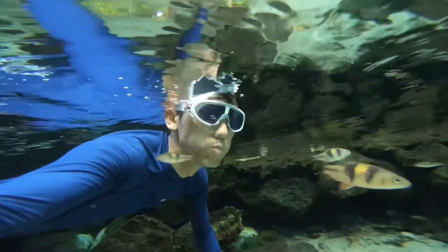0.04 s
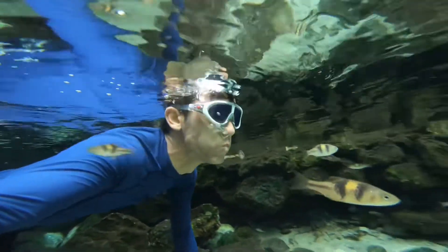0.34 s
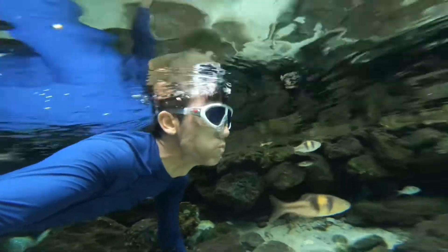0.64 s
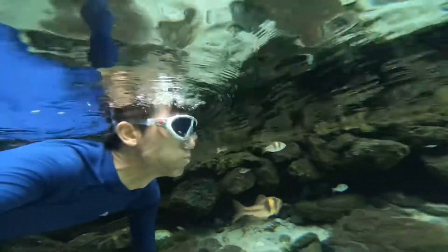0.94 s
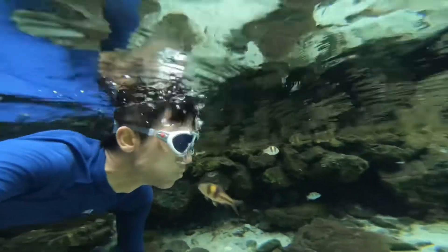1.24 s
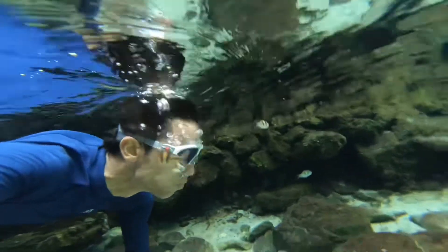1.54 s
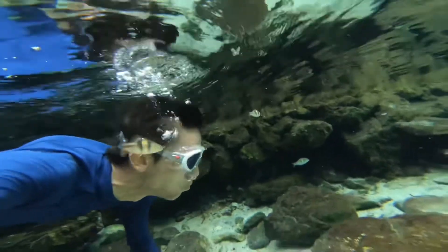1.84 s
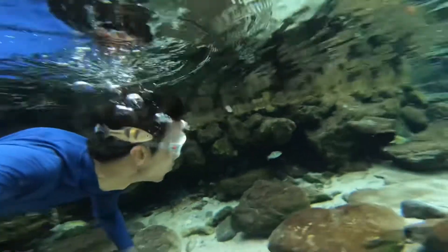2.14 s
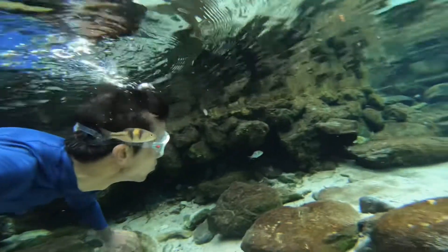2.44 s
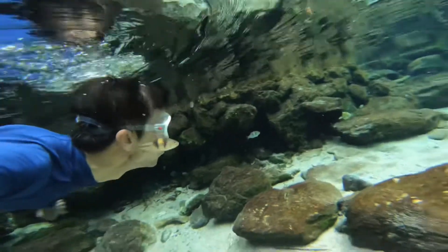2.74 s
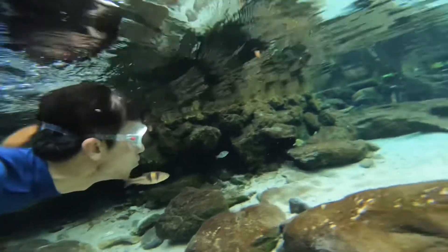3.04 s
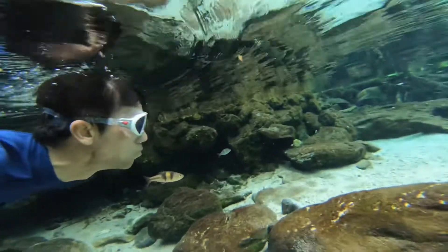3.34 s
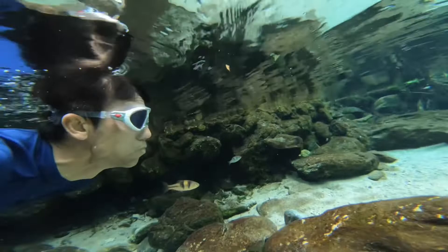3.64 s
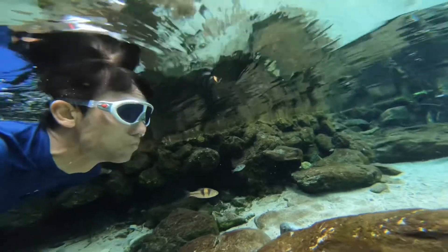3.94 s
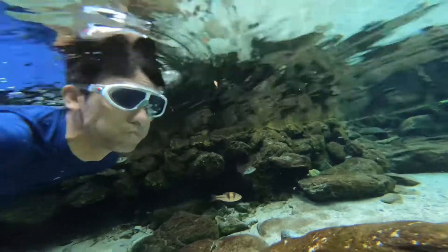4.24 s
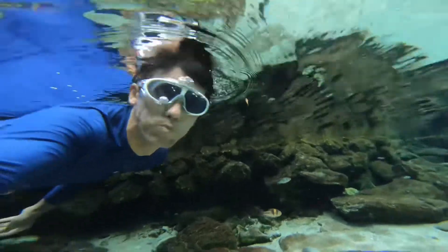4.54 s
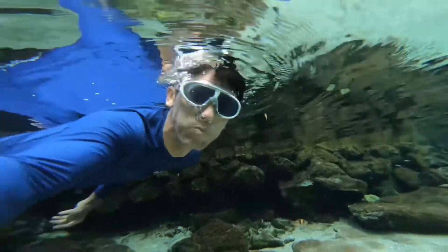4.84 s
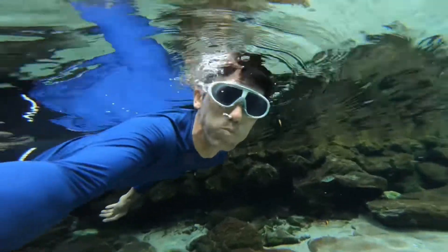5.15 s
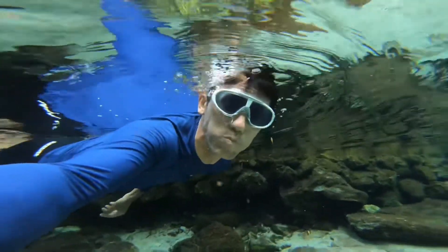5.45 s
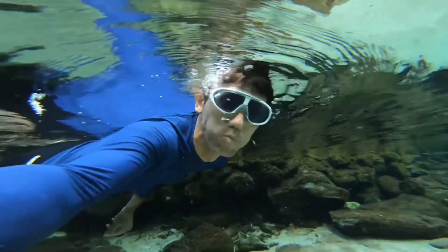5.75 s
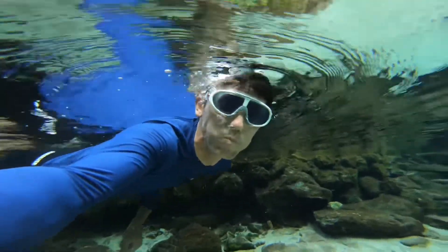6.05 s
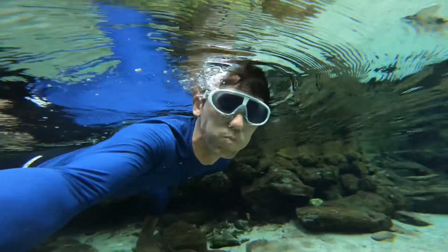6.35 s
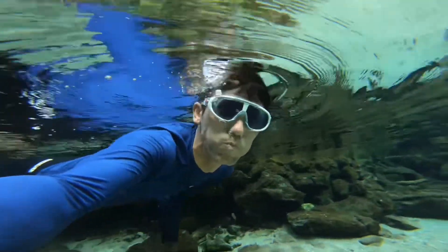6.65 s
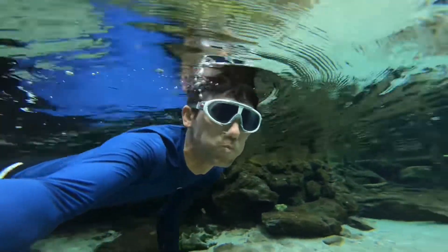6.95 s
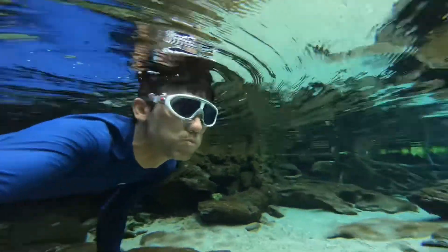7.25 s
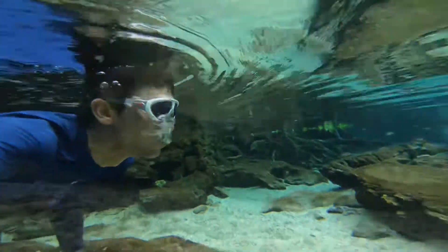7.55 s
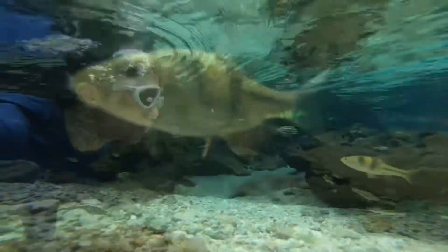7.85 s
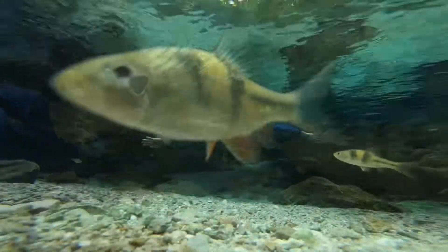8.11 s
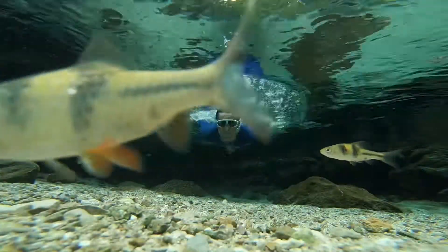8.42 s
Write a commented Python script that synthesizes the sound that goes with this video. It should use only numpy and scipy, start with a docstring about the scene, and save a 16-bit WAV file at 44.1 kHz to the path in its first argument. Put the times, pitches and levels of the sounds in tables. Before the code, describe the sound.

Soft, hollow bubbling and trickling surround a submerged microphone beside a swimmer in a stream. Small plinks and scattered knocks on the housing run throughout, and an early burst of gurgling brings several round, ringing bubbles. In the second half the strokes and current become louder and busier, with a few deep glugs and sharp little ticks. A patch of fizzing bubbles draws near at the close.

```python
"""A camera in a watertight housing, just under a stream's surface, beside a swimmer. From the start, strokes
babble and fizz and drips plink, coloured by the hollow housing; from 0.5 s, knocks set it ringing.
From 1.3 s, clouds of air gurgle and large bubbles ring out. Grains tick on the wall; one click at 3.7 s.
From 4.4 s, strokes and current grow livelier; air pockets glug near 5.1 and 7.5 s.
From 7.8 s, froth drifts up. Faint microphone hiss throughout."""
import sys
import numpy as np
from scipy import signal
from scipy.fft import rfft, irfft, next_fast_len
from scipy.io import wavfile
from scipy.ndimage import uniform_filter1d

SR = 44100
rng = np.random.default_rng(int(sys.argv[2]) if len(sys.argv) > 2 else 0)


def log_audio(samples):
    """Write samples as a 16-bit WAV file to the path given in sys.argv[1]."""
    # one column per channel
    frames = np.atleast_2d(samples).T
    # limit to full scale, then quantise
    limited = np.clip(frames, -1, 1)
    pcm = np.round(limited * 32767).astype(np.int16)
    wavfile.write(sys.argv[1], SR, pcm)


N = 373968
FFT_SIZE = next_fast_len(N + 8192)
FREQ_HZ, TIME_S = np.fft.rfftfreq(FFT_SIZE, 1 / SR), np.arange(N) / SR

# strokes and wavelets: (start [s], length [s], babble [dB], fizz [dB], slosh [dB])
STROKES = [(-0.2, 0.9, -52.5, -67.5, -79), (0.95, 0.59, -80, -63.5, -61), (1.42, 0.48, -57.5, -67.5, -44.5),
           (1.9, 0.59, -55.5, -79, -66), (2.62, 0.49, -53.5, -72.5, -54), (3.88, 0.13, -47.5, -68.5, -58),
           (4.38, 0.28, -42.5, -62.5, -36), (4.9, 0.3, -43.5, -61.5, -44), (5.5, 0.45, -44, -61.5, -44.5),
           (6, 0.74, -43.5, -66, -51), (6.83, 0.16, -39.5, -58, -36.5), (7.17, 0.45, -46, -62, -56.5),
           (8.05, 1, -43.5, -59.5, -75)]
# stream between strokes: (time [s], babble [dB], slosh [dB])
CURRENT = [(0, -62, -63.5), (1.1, -63, -55.5), (3.4, -62.5, -52.5), (5.4, -50, -49), (6.3, -48.5, -53.5),
           (8.48, -44, -66)]
# air dragged under: (start [s], length [s], burble [dB], gurgle [dB])
AIR_CLOUDS = [(1.32, 0.31, -45.5, -46.5), (1.8, 0.648, -48, -53.5), (2.6, 0.27, -53, -51.5),
              (3.45, 1, -58, -55), (4.5, 0.48, -46.5, -61), (5.35, 0.634, -48.5, -58.5),
              (6.15, 0.76, -56, -53), (7.33, 0.29, -47.5, -48.5)]
# blows on the housing: (time [s], level [dB], hardness [dB])
KNOCKS = [(0.539, -33, -10.5), (0.778, -32.5, 1.5), (1.5871, -24.5, -2), (1.762, -28, -13.5),
          (1.8705, -31, 6.5), (2.1485, -28.5, -1), (2.7775, -24, -2), (2.933, -29, 2), (3.166, -29.5, -12),
          (3.687, -25, -1), (3.799, -33.5, -21), (4.366, -22.5, -3.5), (4.465, -20.5, -2), (4.585, -25, 6),
          (4.9737, -28.5, 6), (5.1497, -28, 7), (5.7912, -19, 1.5), (7.0235, -27.5, 5.5)]
# large ringing bubbles: (time [s], pitch [Hz], level [dB])
LARGE_BUBBLES = [(1.4065, 588, -35), (1.4983, 599, -23), (1.585, 740, -28.5), (1.631, 164, -35),
                 (1.689, 566, -35), (1.852, 656, -33), (2.221, 807, -30), (2.2238, 637, -19),
                 (2.378, 159, -33), (2.747, 645, -34), (5.6091, 613, -33.5), (7.578, 595, -36),
                 (7.642, 625, -31.5)]
# drips and small bubbles close by: (time [s], pitch [Hz], level [dB])
DRIPS = [(0.0985, 1243, -29), (0.319, 1460, -38), (0.447, 1260, -31.5), (0.657, 2510, -31),
         (0.973, 2910, -41.5), (1.517, 2860, -36), (1.713, 1304, -36.5), (1.8838, 2920, -41.5),
         (1.971, 2980, -40), (1.974, 1180, -25), (2, 1418, -37), (2.456, 2680, -45.5), (2.642, 1206, -33.5),
         (2.786, 1300, -29), (3.024, 2780, -37), (3.234, 2270, -35), (3.417, 2240, -41.5),
         (3.5678, 1345, -29), (3.7088, 688, -28), (3.748, 1360, -35), (3.882, 731, -29),
         (3.9665, 1150, -23.5), (4.003, 1370, -24.5), (4.048, 1190, -32.5), (4.2399, 687, -29.5),
         (4.604, 1140, -22.5), (4.819, 1162, -29.5), (6.9115, 1446, -24), (6.999, 1310, -25),
         (7.2336, 1213, -26), (8.237, 1800, -25.5), (8.3093, 1800, -27)]
# air pockets: (time [s], length [s], start pitch [Hz], end pitch [Hz], level [dB])
GLUGS = [(5.088, 0.065, 66, 62, -23.5), (7.458, 0.097, 119, 83, -24.5), (7.529, 0.033, 84.4, 70.5, -21)]
# sand and tiny bubbles hitting the wall: (time [s], pitch [Hz], level [dB])
TICKS = [(0.9711, 6650, -44), (2.359, 6900, -46), (3.054, 5380, -35), (3.6311, 5460, -45.5),
         (4.7306, 5250, -45), (4.8327, 5300, -33), (6.0626, 8020, -34), (6.0856, 5830, -35.5),
         (6.347, 5640, -32)]
# housing resonances: (frequency [Hz], width [Hz], washed gain [dB], knocked gain [dB])
HOUSING_MODES = [(168.4, 47.8, -0.5, 19.5), (415.7, 30, -5, 9.5), (617, 71, -8, -19.5),
                 (789, 142, -13.5, -9), (1169.4, 57.7, 6.5, 7), (1414, 93, 3, -51), (1850, 222, -8, -25),
                 (2310, 410, -5, -19), (2676, 150, -8, 12), (3072, 240, -14, -56), (5463, 370, -10, -35),
                 (5940, 1740, -15.5, -47)]
# wall to microphones: (frequency [Hz], left minus right [dB], left lead [rad])
MIC_PATHS = [(62.5, -4, 1), (186, -8.5, -1.13), (393, -5.5, 3.5), (590, -16.5, 5), (783, 1, 1.5),
             (1013, -7, 0.83), (1217, 8.5, 4), (1322, -7, 2.5), (1812, 2.5, -0.5), (1915, -3.5, 2),
             (2580, 6, 1.82), (5800, -3, 0.64), (5980, -6.5, 1), (7900, 3, -2)]
# microphone hiss: (frequency [Hz], relative density [dB])
HISS_SPECTRUM = [(100, 6), (380, 7.5), (1000, -1.5), (4000, -13.5), (12000, -21), (14400, -34)]

TICK_BAND_HZ = (4720, 7800)  # wall passband for ticks and spatter


def water(lap_rms_db=1.7, fizz_share=0.6):
    """Pressure swells, rushing current, five bubble sizes in lapping spurts, crackle of surfacing air."""
    babble_db, fizz_db, slosh_db = stroke_levels_db()
    burble_db = surges_db(AIR_CLOUDS, column=2, calm_db=-59.5, rise_s=0.008, fade_s=0.052)
    gurgle_db = surges_db(AIR_CLOUDS, column=3, calm_db=-61, rise_s=0.008, fade_s=0.052)
    trickle_db = (1 - fizz_share) * babble_db + fizz_share * fizz_db
    wall = washed_wall()
    lapping = spectrum(rng.standard_normal(N)) * band(3.4, 16)
    lap_db = lap_rms_db * unit_rms(irfft(lapping, FFT_SIZE)[:N])
    swells, eddies = spectrum(rng.standard_normal((2, 2, N)))
    slosh = amp(slosh_db + 2 * lap_db) * unit_rms(to_mics(*swells * band(6.6, 32.2)))
    rush = amp(babble_db - 13) * unit_rms(to_mics(*eddies * band(208, 980)))
    burble = swarm(burble_db + lap_db, wall * band(124, 246), pitch_hz=(131.3, 263),
                   peak_per_s=60, decay_cycles=0.96, spread_db=2, wash_db=-5.5)
    gurgle = swarm(gurgle_db + lap_db, wall * band(384, 896), pitch_hz=(496, 916),
                   peak_per_s=130, decay_cycles=1.08, spread_db=6, wash_db=-9, crowding=0.3)
    babble = swarm(babble_db + lap_db, wall * band(945, 1696, order=3), pitch_hz=(1036, 1493),
                   peak_per_s=500, decay_cycles=4, spread_db=4, wash_db=-3.5, crowding=0.9)
    trickle = swarm(trickle_db + lap_db, wall * band(1615, 3054, order=6), pitch_hz=(1716, 3155),
                    peak_per_s=700, decay_cycles=4.1, spread_db=3.5, wash_db=-3.5, crowding=0.9)
    fizz = swarm(fizz_db + lap_db, wall * band(3030, 8960), pitch_hz=(5270, 7700),
                 peak_per_s=1000, decay_cycles=4.7, spread_db=9, wash_db=0.2)
    splashes = crackle(gurgle_db - 13.5 + lap_db, band(2160, 3220, order=3))
    splashes += crackle(gurgle_db - 19, wall * band(*TICK_BAND_HZ, order=4))
    return slosh + burble + shoals(rush + gurgle + babble + trickle) + fizz + splashes


def stroke_levels_db():
    """Babble, fizz and slosh: each stroke lifts all three above the current."""
    times_s, babble_db, slosh_db = np.transpose(CURRENT)
    calm_db = np.interp(TIME_S, times_s, babble_db)
    return (surges_db(STROKES, column=2, calm_db=calm_db),
            surges_db(STROKES, column=3, calm_db=0.8 * calm_db - 26),
            surges_db(STROKES, column=4, calm_db=np.interp(TIME_S, times_s, slosh_db), fade_s=0.065))


def surges_db(rows, column, calm_db, rise_s=0.06, fade_s=0.087):
    """Surges build, hold and fade over calm water; long ones build more slowly."""
    power = amp(calm_db) ** 2 * np.ones(N)
    for row in rows:
        age_s, length_s = TIME_S - row[0], row[1]
        attack = np.clip(age_s / (rise_s + 0.15 * length_s), 0, 1)
        release = np.exp(-np.maximum(age_s - length_s, 0) / fade_s)
        power += (amp(row[column]) * attack * release) ** 2
    return 10 * np.log10(power)


def swarm(level_db, colour, pitch_hz, peak_per_s, decay_cycles, spread_db, wash_db,
          crowding=0.6, sizes=28):
    """Near bubbles over a wash of distant ones; harder stirring frees more."""
    activity = amp(crowding * (level_db - level_db.max()))
    near = np.zeros((2, N))
    for hz in np.geomspace(*pitch_hz, sizes):
        age = np.arange(int(8 * decay_cycles / hz * SR)) / SR * hz / decay_cycles
        phase_rad = 2 * np.pi * decay_cycles * age * (1 + 0.0046 * age)
        ring = age * np.exp(-age) * np.sin(phase_rad) * np.sqrt(hz / pitch_hz[0])
        for channel in near:
            when, chance, size, sign = rng.random((int(peak_per_s * N / SR / sizes), 4)).T
            onsets = (when * N).astype(int)
            size_db = spread_db * np.minimum(-np.log(size), 3)
            gain = amp(size_db) * np.sign(sign - 0.5) / np.sqrt(activity[onsets])
            for k in np.flatnonzero(chance < activity[onsets]):
                add(channel, onsets[k] / SR, gain[k] * ring)
    near = spectrum(unit_rms(near)) * colour
    far = spectrum(rng.standard_normal((2, N)) * np.sqrt(activity)) * colour
    return amp(level_db) * unit_rms(unit_rms(to_mics(*near)) + amp(wash_db) * unit_rms(to_mics(*far)))


def shoals(x, depth_db=3):
    """Bubbles come in shoals of like size, so the strongest pitches keep moving."""
    frames = signal.stft(x, nperseg=512)[2]
    patches = rng.standard_normal(frames.shape[:0:-1])  # time by frequency
    for _ in range(2):
        patches = uniform_filter1d(patches, size=11, axis=0)
        patches = uniform_filter1d(patches, size=4, axis=1)
    patchy = signal.istft(frames * amp(depth_db * unit_rms(patches).T))[1][:, :N]
    return unit_rms(patchy) * np.std(x)


def crackle(level_db, colour, rate_per_s=22, spread_db=7, decay_s=0.0039):
    """Bubbles burst at the surface: short, irregular, unpitched."""
    gains = amp(spread_db * np.minimum(rng.exponential(1, N), 3))
    impulses = gains * (rng.random(N) < rate_per_s / SR)
    bursts = signal.lfilter([1], [1, -np.exp(-1 / (decay_s * SR))], impulses)
    spatter = bursts * rng.exponential(1, N) * rng.standard_normal((2, N))
    return amp(level_db) * unit_rms(to_mics(*spectrum(spatter) * colour))


def knocks(lag_s=0.00078, rebound_s=0.00278, push_s=0.0059, churn_s=0.0057, churn_gain=0.32):
    """Blows ring the housing and churn the water. Soft: duller, later rebound. Hard: a plop of water."""
    wall = sum((-1) ** k * amp(db) * resonance(hz, 1.32 * width_hz)
               for k, (hz, width_hz, _, db) in enumerate(HOUSING_MODES))
    balance = amp([[-6], [0]])
    thud = impulse_response(wall * band(31, 1650)) * balance
    clack = impulse_response(wall * band(447, 1280, order=4))
    out, t = np.zeros((2, N)), np.arange(SR // 20) / SR
    push = t / push_s * np.exp(1 - t / push_s) * balance
    for time_s, db, hardness_db in KNOCKS:
        ring = np.zeros((2, SR // 10))
        add(ring, 0, amp(hardness_db + 2.5) * clack)
        add(ring, lag_s, thud)
        add(ring, lag_s + rebound_s * amp(-0.43 * hardness_db), 0.38 * rng.random() * thud)
        add(ring, rebound_s, amp(hardness_db - 11) * push)
        eddy = rng.standard_normal(len(t)) * t * np.exp(-t / churn_s)
        eddy /= np.linalg.norm(eddy)
        ring += churn_gain * signal.fftconvolve(ring, eddy[None], axes=1)[:, :SR // 10]
        cutoff_hz = 1850 * amp(0.1 * hardness_db)  # water rounds off the blow
        lowpass = signal.butter(4, cutoff_hz, fs=SR, output="sos")
        add(out, time_s, amp(db) * signal.sosfilt(lowpass, ring))
    return out


def large_bubbles(glide=0.0089, echo_db=-17, echo_decay_s=0.15):
    """Each swells and fades, pitch rising; strong ones last longer. The bed scatters a faint tail."""
    out, mean_db = np.zeros(N), np.mean([db for _, _, db in LARGE_BUBBLES])
    for time_s, hz, db in LARGE_BUBBLES:
        rise_s = max(0.0043, 1 / hz)
        fade_s = max(0.0051 * amp(0.64 * (db - mean_db)), 1 / hz)
        t = np.arange(int((rise_s + 10 * fade_s) * SR)) / SR
        envelope = (t / rise_s) ** (rise_s / fade_s) * np.exp((rise_s - t) / fade_s)
        cycles = np.cumsum(hz * (1 + glide * (t - rise_s) / fade_s)) / SR
        add(out, time_s, amp(db) * envelope * np.sin(2 * np.pi * cycles))
    t = np.arange(SR // 4) / SR
    tail = rng.standard_normal((2, len(t))) * np.exp(-t / echo_decay_s)
    tail *= amp(echo_db) / np.linalg.norm(tail[0])
    direct = spectrum(out)
    return to_mics(direct) + to_mics(*direct * spectrum(tail))


def drips(decay_cycles=3.3, splash_db=-3, splash_s=0.0064):
    """A tiny splash and the plink of its trapped bubble, both ringing the wall."""
    out, t = np.zeros((2, N)), np.arange(SR // 20) / SR
    wall = impulse_response(washed_wall())
    for time_s, hz, db in DRIPS:
        age = t * hz / decay_cycles
        plink = age * np.exp(-age) * np.sin(2 * np.pi * hz * t)
        bandpass = signal.butter(3, [0.39 * hz, 1.42 * hz], "band", fs=SR, output="sos")
        spray = rng.standard_normal(len(t)) * rng.exponential(1, len(t))
        splash = signal.sosfilt(bandpass, spray * np.exp(-t / splash_s))
        for part, part_db in ((plink, 0), (splash, splash_db)):
            ring = signal.fftconvolve(part[None], wall, axes=1)
            add(out, time_s, amp(db + part_db) * ring / abs(ring).max())
    return out


def glugs():
    """A large air pocket throbs for a few cycles, pitch sinking."""
    out = np.zeros(N)
    for time_s, length_s, start_hz, end_hz, db in GLUGS:
        hz = np.linspace(start_hz, end_hz, int(length_s * SR))
        throb = np.sin(2 * np.pi * np.cumsum(hz) / SR)
        add(out, time_s, amp(db) * signal.windows.tukey(len(hz), 0.8) * throb)
    return to_mics(spectrum(out))


def froth(start_s=7.83, rise_s=0.67, ring_db=-39.5, rush_db=-42):
    """Bubbles of nearly one size over a low rush; both swell on approach."""
    nearness = np.clip((TIME_S - start_s) / rise_s, 0, 1)
    ringing = swarm(np.full(N, ring_db), band(1680, 2040), pitch_hz=(1730, 2000),
                    peak_per_s=100, decay_cycles=5.8, spread_db=6, wash_db=-6, sizes=8)
    eddies = spectrum(rng.standard_normal((2, N))) * band(91, 490, order=3)
    rush = amp(rush_db) * unit_rms(to_mics(*eddies))
    return nearness ** 2 * ringing + nearness ** 3 * rush


def ticks(width_hz=520, rattle_s=0.0021):
    """A grain rattles on the wall and leaves a short, high ring."""
    out, t = np.zeros(N), np.arange(SR // 20) / SR
    for time_s, hz, db in TICKS:
        rattle = rng.standard_normal(len(t)) * np.exp(-t / rattle_s)
        ping = np.exp(-np.pi * width_hz * t) * np.sin(2 * np.pi * hz * t)
        ring = signal.fftconvolve(rattle, ping)
        add(out, time_s, amp(db) * ring / abs(ring).max())
    return to_mics(spectrum(out) * band(*TICK_BAND_HZ))


def click(time_s=3.7285, level_db=-42):
    """One dry, bright click, alike in both channels."""
    out = np.zeros(N)
    add(out, time_s, amp([level_db]))
    return out


def hiss(level_db=-64):
    """Steady noise, independent in each microphone."""
    noise = spectrum(rng.standard_normal((2, N))) * amp(curve(HISS_SPECTRUM))
    return amp(level_db) * unit_rms(irfft(noise, FFT_SIZE)[:, :N])


def washed_wall():
    """Housing response to sound in the water."""
    return sum((-1) ** k * amp(db) * resonance(hz, width_hz)
               for k, (hz, width_hz, db, _) in enumerate(HOUSING_MODES))


def to_mics(direct, diffuse=None, coherent_below_hz=6700):
    """Spectra to stereo: the flexing wall gives each microphone its own level and phase."""
    ratio, lead_rad = amp(curve(MIC_PATHS)), curve(MIC_PATHS, column=2)
    coherence = 0.95 / np.hypot(1, (FREQ_HZ / coherent_below_hz) ** 2)
    left = direct if diffuse is None else coherence * direct + np.sqrt(1 - coherence ** 2) * diffuse
    pair = np.array([left * ratio * np.exp(1j * lead_rad), direct])
    return irfft(pair * np.sqrt(2 / (1 + ratio ** 2)), FFT_SIZE)[:, :N]


def impulse_response(response):
    """Short stereo ring, unit peak of mean channel power."""
    ring = to_mics(response)[:, :SR // 16]
    return ring / np.sqrt(np.mean(ring ** 2, axis=0).max())


def resonance(hz, width_hz):
    """One mode, unit peak gain."""
    return 1j * FREQ_HZ * width_hz / (hz ** 2 - FREQ_HZ ** 2 + 1j * FREQ_HZ * width_hz)


def band(low_hz, high_hz, order=2):
    """Causal band-pass response."""
    sos = signal.butter(order, [low_hz, high_hz], "band", fs=SR, output="sos")
    return signal.sosfreqz(sos, FREQ_HZ, fs=SR)[1]


def curve(table, column=1):
    """Table column interpolated over log frequency."""
    table = np.array(table)
    return np.interp(np.log(FREQ_HZ + 1), np.log(table[:, 0] + 1), table[:, column])


def add(mix, time_s, sound):
    """Mix in place at time_s."""
    part = mix[..., max(round(time_s * SR), 0):][..., :sound.shape[-1]]
    part += sound[..., :part.shape[-1]]


def spectrum(x):
    return rfft(x, FFT_SIZE)


def amp(db):
    return 10 ** (np.asarray(db) / 20)


def unit_rms(x):
    return x / np.sqrt(np.mean(x ** 2) + 1e-30)


def scene():
    """Sum at the two microphones."""
    return water() + froth() + drips() + ticks() + click() + large_bubbles() + glugs() + knocks() + hiss()


def record(dry):
    """Low-pass at 14.4 kHz."""
    lowpass = signal.firwin(511, 14400, window=("kaiser", 9), fs=SR)
    return signal.oaconvolve(dry, lowpass[None], "same")


dry = scene()
out = record(dry)
log_audio(out)
```